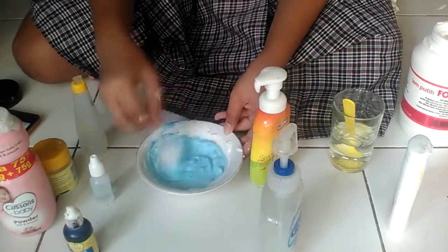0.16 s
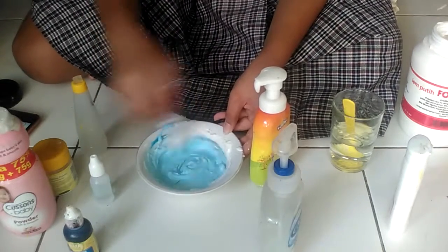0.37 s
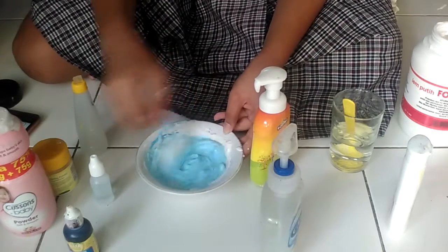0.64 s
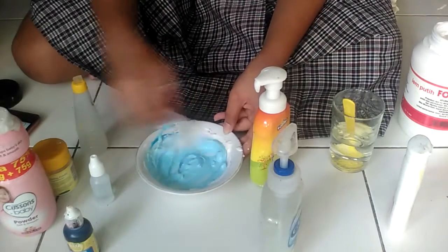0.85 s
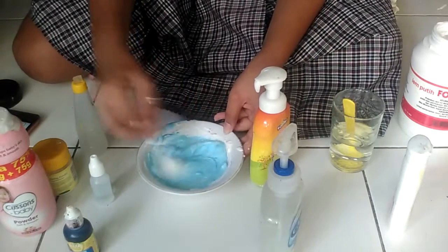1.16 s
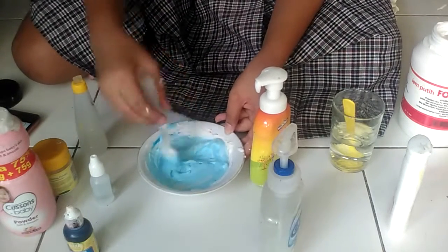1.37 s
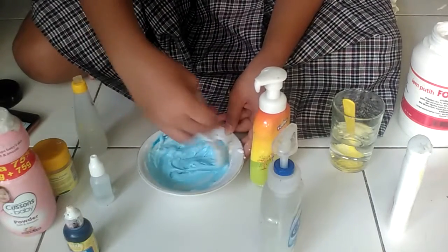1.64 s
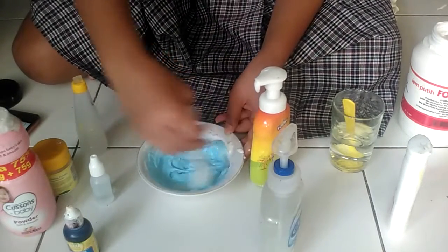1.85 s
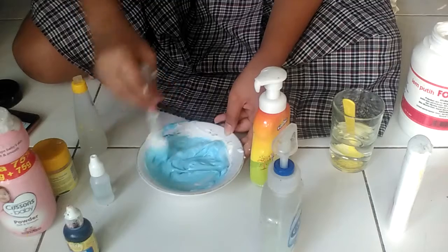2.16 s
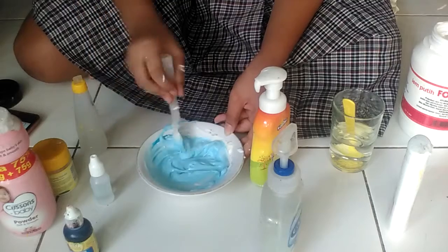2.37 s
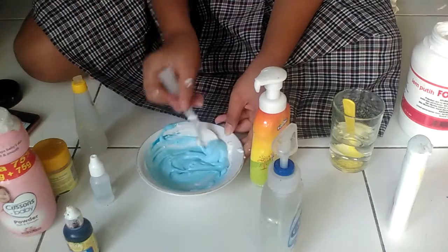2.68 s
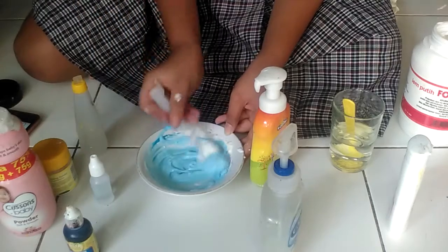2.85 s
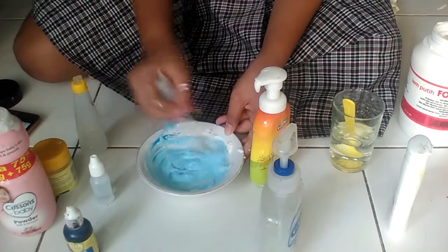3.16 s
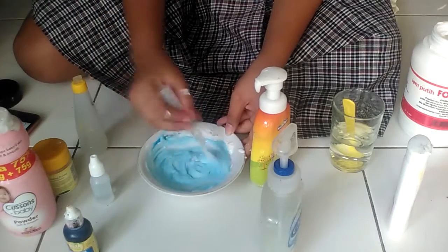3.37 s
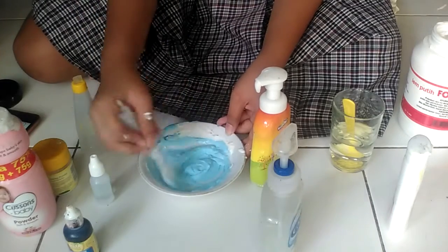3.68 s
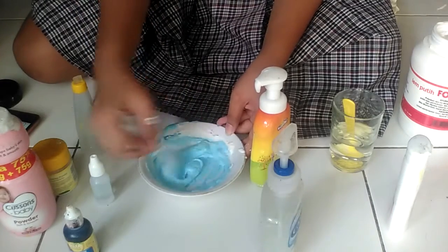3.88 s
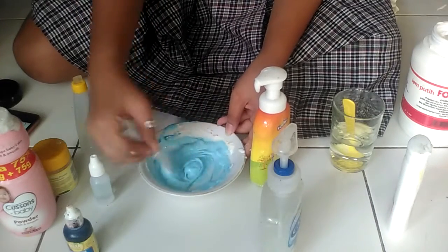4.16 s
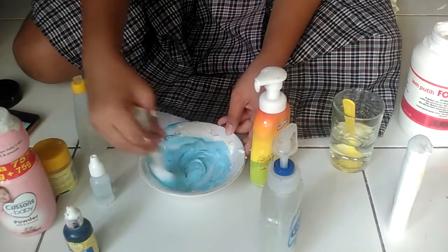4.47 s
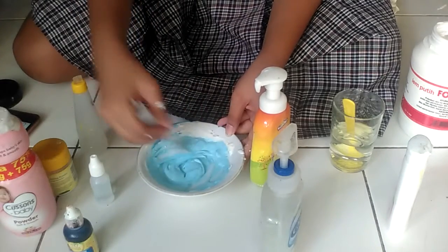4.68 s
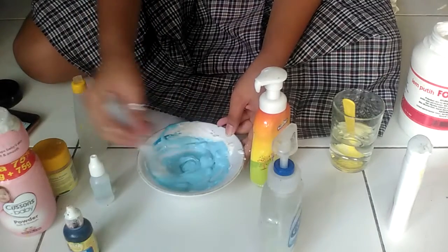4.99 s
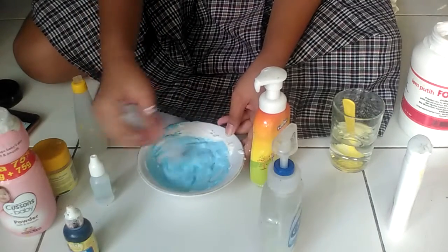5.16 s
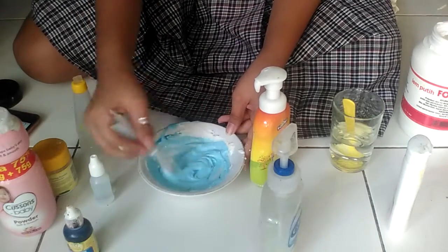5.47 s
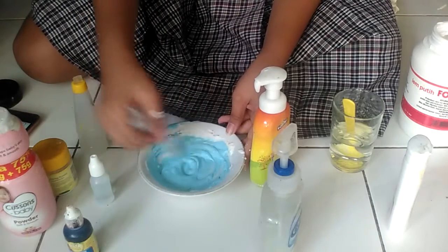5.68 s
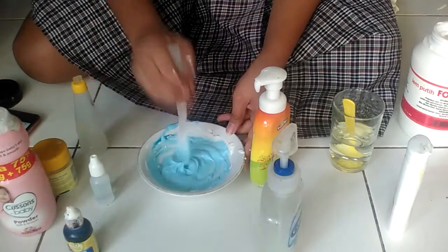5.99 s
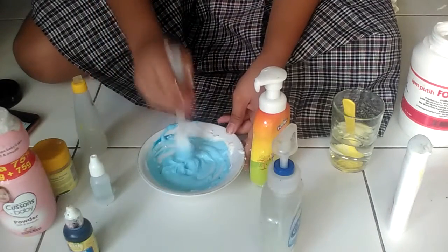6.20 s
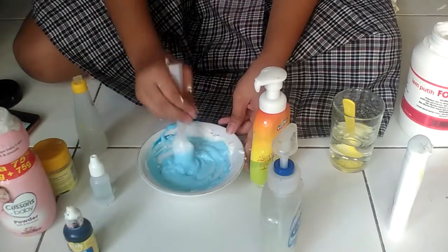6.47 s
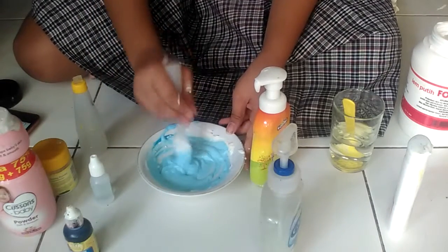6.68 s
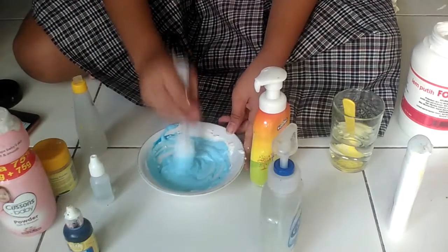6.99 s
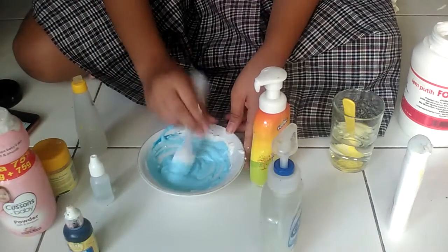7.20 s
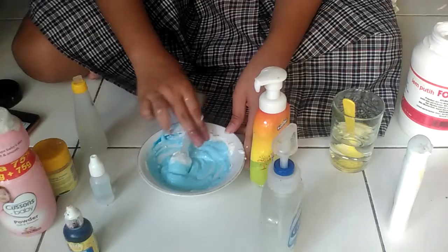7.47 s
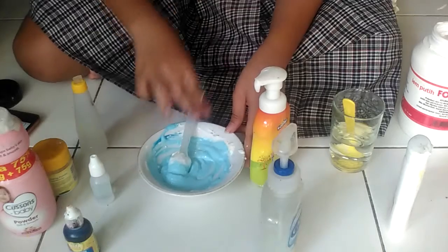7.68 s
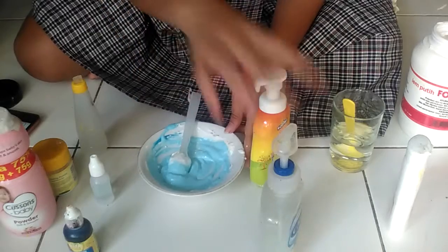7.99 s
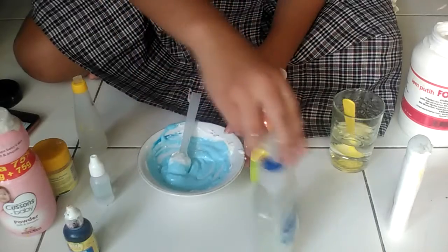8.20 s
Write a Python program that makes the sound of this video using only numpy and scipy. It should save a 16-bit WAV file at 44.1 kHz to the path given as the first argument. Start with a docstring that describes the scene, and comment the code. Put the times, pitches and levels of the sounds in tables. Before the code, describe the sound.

A plastic spoon stirs thick slime in a ceramic bowl, straight ahead of the microphone in a bare, echoing room. It opens with a cluster of ringing taps on the rim, then taps only now and then while the slime smacks and crackles faintly. Later comes a quick, even run of duller knocks on the bottom. Soft bumps end it as the spoon is let go, over a low rumble and faint hiss.

```python
"""Ringing taps of a plastic spoon on the rim of a ceramic bowl, as it stirs thick slime. The bowl is held on
the tiled floor of a bare, echoing room. Between taps the slime smacks and crackles faintly; later the spoon
knocks the slime-damped bottom in a quick run. Soft bumps of hand, spoon and bottle come now and then.
Underneath lie the shifting of bowl and cloth, a low rumble, a hum and faint hiss."""
import sys
import numpy as np
from scipy import signal
from scipy.fft import rfft, irfft, next_fast_len
from scipy.io import wavfile
from scipy.ndimage import map_coordinates

SR = 44100
rng = np.random.default_rng(int(sys.argv[2]) if len(sys.argv) > 2 else 0)


def digitize_waveform(pressure):
    """Quantize a signal to 16-bit integers and store it at the path in sys.argv[1].

    Rows of a 2-D input are taken as channels; values are limited to [-1, 1].
    """
    field = np.atleast_2d(pressure).T
    bounded = np.clip(field, -1, 1)
    quanta = np.round(bounded * 32767).astype(np.int16)
    wavfile.write(sys.argv[1], SR, quanta)


N = 367794
CONTACT_SAMPLES = SR // 6
LN_1000 = np.log(1000)  # 60 dB of decay

# Each row: start in seconds, attack level in dB in each of the four REGISTERS_HZ,
# ring gain in dB, favoured frequency in Hz.
RIM_TAPS = [(-0.15, -31, -26.5, -31.5, -38, -1.5, 1430), (0.0711, -36, -27.5, -29.5, -45.5, 2.5, 1497),
            (0.3125, -27.5, -22.5, -21.5, -26, 1, 3440), (0.527, -45, -36.5, -41.5, -50, 5, 1540),
            (0.533, -34.5, -32, -32, -53, 2.5, 3340), (0.6088, -64, -53, -51.5, -51.5, -20, 5800),
            (0.6581, -46.5, -36, -42.5, -59.5, 7.5, 1510), (0.7512, -45.5, -40.5, -43.5, -89, -0.5, 3500),
            (1.0704, -76, -82.5, -59, -52, -1, 5730), (2.627, -42.5, -35, -38.5, -55.5, -2.5, 3640),
            (2.845, -41.5, -47, -52, -81, 5, 1440), (2.853, -39.5, -30.5, -30, -43.5, 1, 3340),
            (3.078, -52.5, -49.5, -59.5, -76.5, -5.5, 1380), (3.53, -58, -64, -75, -80.5, -2.5, 846),
            (4.516, -54.5, -59, -76.5, -79.5, 1, 850), (4.812, -65.5, -58, -61, -64, 0.5, 3460),
            (4.838, -40, -34, -36, -53.5, 2, 1553), (6.9651, -46, -49, -49, -49, 5.5, 5670)]
# Each row: frequency in Hz, relative level in dB, t60 in seconds.
RIM_MODES = [(672, -10, .035), (864, -7.5, 0.018), (1136, -15.5, 0.06), (1200, -22, .04),
             (1428, -16.5, 0.12), (1530, -21.5, .06), (1745, -11.5, 0.11), (1801, -12.5, .05),
             (2260, -10, 0.019), (2220, -11.5, .015), (2720, -8, 0.0074), (3512, -3.5, 0.033),
             (3541, -9.5, 0.046), (4330, -19.5, 0.019), (5760, -12, 0.048), (7600, -23, 0.0045),
             (10860, -27, 0.012)]
# Each row: frequency in Hz, gain in dB.
RIM_CRACK_EQ = [(150, -20.5), (300, -16.5), (480, -5.5), (700, -6), (1500, 4), (2800, 6.5), (4200, -1.5),
                (6000, -1.5), (7500, -12), (9200, -25.5), (11000, -25), (14000, -37.5)]


def rim_taps(echoes, favour_db=9.5, favour_log_width=0.11):
    """The struck spot favours nearby frequencies; a spoon left pressed on lets the rim ring less."""
    out = np.zeros(N)
    hz, db, t60_s = np.transpose(RIM_MODES)
    for start_s, *levels_db, ring_db, favoured_hz in RIM_TAPS:
        nearness = np.exp(-(np.log(hz / favoured_hz) / favour_log_width) ** 2)
        modes = zip(hz, db + ring_db + favour_db * nearness, t60_s)
        paths = room_response(echoes, scatter_db=-18.0, scatter_s=0.004)
        add(out, start_s, blow(levels_db, modes, RIM_CRACK_EQ, paths, crack_db=25.0, spread_db=4.0))
    return out


# Each row: start in seconds, attack level in dB in each of the four REGISTERS_HZ.
BOTTOM_KNOCKS = [(5.3497, -38.5, -39, -46.5, -50), (5.531, -32, -36, -34, -41),
                 (5.72, -36, -36, -35.5, -40), (5.9129, -38, -33.5, -33.5, -38),
                 (6.0924, -36, -36, -37, -41), (6.2796, -36.5, -33, -34, -39.5),
                 (6.4569, -43, -31, -29.5, -40), (6.6765, -56.5, -41.5, -43.5, -61.5)]
# Each row: frequency in Hz, relative level in dB, t60 in seconds.
BOTTOM_MODES = [(530, -13, 0.027), (765, 6.5, 0.0047), (860, 8.5, 0.018), (1498, -3.5, 0.025),
                (1660, -5, 0.042), (2380, -16.5, 0.033), (2730, -8, 0.0023), (3737, -5, 0.03),
                (5500, -26, 0.013), (5490, -9, 0.0086)]
# Each row: frequency in Hz, gain in dB.
BOTTOM_CRACK_EQ = [(150, -11), (300, -37.5), (480, -7.5), (750, -15.5), (1500, 5), (2600, 6.5), (4200, 8.5),
                   (6000, 8), (7500, -1.5), (9200, -12), (14000, -26.5)]


def bottom_knocks(echoes):
    """The spoon hits the bottom through the slime, which damps the ring."""
    out = np.zeros(N)
    for start_s, *levels_db in BOTTOM_KNOCKS:
        paths = room_response(echoes, scatter_db=-13.5, scatter_s=0.0016)
        knock = blow(levels_db, BOTTOM_MODES, BOTTOM_CRACK_EQ, paths, crack_db=28.5, spread_db=2.5)
        add(out, start_s, knock)
    return out


# Body, low mid, high mid, edge. Each row: lower limit in Hz, upper limit in Hz.
REGISTERS_HZ = [(300, 1150), (1150, 2400), (2400, 4500), (4500, 12000)]


def blow(levels_db, modes, crack_eq, paths, crack_db, spread_db, detune=0.008):
    """One contact, heard in the room: a crack plus modes that the slime loads differently each time."""
    t = np.arange(CONTACT_SAMPLES) / SR
    sound = from_db(crack_db) * colour(signal.unit_impulse(CONTACT_SAMPLES), crack_eq)
    for k, (hz, db, t60_s) in enumerate(modes):
        loaded_hz = hz * (1 + detune * rng.normal())
        gain = (-1) ** k * from_db(db + spread_db * rng.normal())
        sound += gain * np.sin(2 * np.pi * loaded_hz * t) * decay(t, t60_s)
    bass_cut = signal.butter(2, 300, "high", fs=SR, output="sos")  # a small bowl radiates no bass
    sound = signal.fftconvolve(signal.sosfilt(bass_cut, sound), paths)[:len(paths)]
    # Place and hardness of the contact set each register's attack level.
    attack_samples = round(0.015 * SR)
    centres_hz = np.sqrt(np.prod(REGISTERS_HZ, axis=1))
    for _ in range(2):
        attack_rms = [rms(band(sound[:attack_samples], *limits_hz)) for limits_hz in REGISTERS_HZ]
        gains_db = np.array(levels_db) - 20 * np.log10(attack_rms)
        sound = colour(sound, np.column_stack([centres_hz, gains_db]))
    return sound


# Each row: start in seconds, relative level in dB, centre in Hz, rub t60 in seconds.
SOFT_BUMPS = [(2.121, -66, 370, 0.092), (2.781, -59.5, 185, 0.11), (3.27, -66, 257.4, 0.12),
              (3.73, -60, 325, 0.051), (5.342, -54.5, 344, 0.013), (7.552, -53, 481, 0.03),
              (7.57, -54.5, 380, 0.063), (7.579, -70, 1317, 0.023), (7.721, -48, 308, 0.04),
              (8.121, -52.5, 736, 0.032), (8.124, -54, 365, 0.019)]


def bumps(band_ratio=1.3, gain_db=-0.5, rub_db=-10.0):
    """Soft contacts of hand, spoon and bottle: a dull push and a brief rub."""
    out = np.zeros(N)
    t = np.arange(CONTACT_SAMPLES) / SR
    for start_s, db, hz, t60_s in SOFT_BUMPS:
        rub = from_db(rub_db) * rng.standard_normal(len(t)) * decay(t, t60_s)
        thud = band(signal.unit_impulse(len(t)) + rub, hz / band_ratio, hz * band_ratio)
        add(out, start_s, from_db(db + gain_db) * thud / rms(thud[:SR // 50]))
    return out


# Each row: peak time in seconds, half-width in seconds, relative level in dB, centre in Hz. # The short, loud
# row at 7 s is a light bounce of the spoon on the rim.
SLIME_SMACKS = [(0.875, 0.013, -68.5, 5700), (1.5, 0.059, -73.5, 6400), (1.828, 0.038, -65, 1038),
                (2.054, 0.1, -70, 603), (2.552, 0.033, -72, 7300), (2.607, 0.033, -67, 3954),
                (3.286, 0.035, -71, 4800), (3.51, 0.051, -68, 5530), (3.72, 0.15, -70.5, 447),
                (3.976, 0.041, -74, 5850), (4.156, 0.047, -67.5, 4800), (4.209, 0.094, -68.5, 2540),
                (4.237, 0.091, -71.5, 1150), (4.787, 0.045, -64, 3360), (7, 0.0052, -52.5, 5800),
                (7.332, 0.16, -77, 2906), (7.569, 0.03, -69, 6050), (8.134, 0.025, -72, 6000)]


def smacks(band_ratio=1.35, gain_db=-2.0):
    """Slime pulls away from spoon and wall in swells of tiny bursting air pockets; the sharp burst at 7 s is
    the spoon bouncing on the rim."""
    out = np.zeros(N)
    t = np.arange(SR // 2) / SR - 0.25
    for peak_s, half_width_s, db, hz in SLIME_SMACKS:
        pops = air_pops(len(t), pops_per_s=1500, size_db=6.0)
        pops = band(pops + 1e-18, hz / band_ratio, hz * band_ratio)
        swell = np.exp(-2 * (t / half_width_s) ** 2)
        add(out, peak_s + t[0], from_db(db + gain_db) * swell * pops / rms(pops))
    return out


# How hard the spoon works the slime. Each row: time in seconds, relative level in dB.
STIR_EFFORT = [(0, -69), (1.0, -78.5), (2.2, -84), (3.3, -78.5), (4.1, -86), (4.6, -80), (6.5, -85),
               (7.2, -87), (8.34, -82)]
# Each row: frequency in Hz, gain in dB.
SQUELCH_EQ = [(300, -10), (900, 6.5), (2500, 2), (5500, 2), (8000, -5), (14000, -12.5)]


def squelch(clump_db=3, clumps_per_s=9):
    """Stirred slime crackles softly throughout, in clumps as it folds."""
    pops = colour(air_pops(N, pops_per_s=400, size_db=4.0), SQUELCH_EQ)
    return from_db(in_time(STIR_EFFORT) + clump_db * drift(clumps_per_s)) * pops / rms(pops)


def air_pops(samples, pops_per_s, size_db):
    """Air pockets burst at random: many small impulses, a few large."""
    sizes = from_db(size_db * np.minimum(rng.exponential(1, samples), 4))
    signs = rng.choice([-1, 1], samples)
    return sizes * signs * (rng.random(samples) < pops_per_s / SR)


# Off floor, bottles and walls. Each row: delay in seconds, linear gain.
FIRST_REFLECTIONS = [(.0011, 0.15), (.0047, -0.18), (.0078, 0.045), (.0146, 0.23), (0.0178, -0.21),
                     (.043, 0.14)]


def room_response(echoes, scatter_db=-22.5, scatter_s=0.0035, shared_weight=0.4):
    """Paths from one spot in the bowl: its own blend of echoes, near scatter, direct, reflected."""
    blend = rng.standard_normal(len(echoes))
    blend[0] = shared_weight
    response = blend @ echoes / np.linalg.norm(blend)
    t = np.arange(SR // 25) / SR
    response[:len(t)] += from_db(scatter_db) * rng.standard_normal(len(t)) * np.exp(-t / scatter_s)
    response[0] += 1
    for delay_s, gain in FIRST_REFLECTIONS:
        response[round(delay_s * SR)] += gain
    return response


# Each row: frequency in Hz, t60 in seconds, relative echo energy in dB.
ROOM_DECAY = [(200.9, 0.42, 1.5), (492, 0.61, -3), (890, .65, -1.5), (1620, 0.74, -1.5), (2720, 0.46, -5),
              (4000, 0.93, -8.5), (5900, .47, -3.5), (12000, 0.4, -1)]


def room_echo(early_db=-2.0, early_t60_s=0.1, build_s=0.0068):
    """The bare room returns dense early scatter and a tail that dies band by band."""
    t = np.arange(2 * SR // 3) / SR
    room = np.array(ROOM_DECAY)
    edges_hz = np.geomspace(100, 16000, 15)
    white = rng.standard_normal((2, len(t))) / np.sqrt(SR)
    early = from_db(early_db) * decay(t, early_t60_s) / np.sqrt(early_t60_s)
    tail = np.zeros(len(t))
    for k, (low_hz, high_hz) in enumerate(zip(edges_hz, edges_hz[1:])):
        hz = np.sqrt(low_hz * high_hz)
        t60_s, late_db = at_hz(room[:, [0, 1]], hz), at_hz(room[:, [0, 2]], hz)
        late = from_db(late_db) * decay(t, t60_s) / np.sqrt(t60_s)
        tail += band(white[k % 2], low_hz, high_hz) * np.hypot(late, early) * np.sqrt(2 * LN_1000)
    return tail * (1 - np.exp(-t / build_s))


# Each row: frequency in Hz, side gain in dB.
BOWL_SIDE_EQ = [(3200, -67), (4500, -26), (5600, -20), (8000, -10), (14000, -8.5)]


def widen(mid, spread_s=0.005):
    """Brief scatter makes left and right differ in the treble only."""
    t = np.arange(SR // 25) / SR
    scatter = rng.standard_normal(len(t)) * np.exp(-t / spread_s)
    scatter /= np.linalg.norm(scatter)
    side = colour(signal.oaconvolve(mid, scatter)[:N], BOWL_SIDE_EQ)
    return np.array([mid + side, mid - side])


# Each row: time in seconds, relative level in dB.
SHIFT_LEVELS = [(0.0, -66.5), (0.86, -67.5), (1.32, -70.5), (3.07, -63), (3.34, -65.5), (5.99, -68.5),
                (6.2, -69), (7.76, -67), (8.34, -71)]
# Each row: frequency in Hz, gain in dB.
SHIFT_EQ = [(70, -11.5), (150, 7), (220, -3.5), (330, -6), (500, -10.5), (800, -14), (1500, -27),
            (4000, -48.5)]


def shifting(gain_db=1.5, lump_db=2, lumps_per_s=12):
    """The stirring arm moves bowl and cloth unevenly."""
    return from_db(in_time(SHIFT_LEVELS) + gain_db + lump_db * drift(lumps_per_s)) * noise(SHIFT_EQ)


# Each row: time in seconds, relative level in dB.
RUMBLE_LEVELS = [(0.05, -56.5), (0.09, -65), (0.18, -53), (0.25, -66.5), (1.87, -65.5), (2.23, -56),
                 (3.07, -68), (3.23, -54), (3.32, -68.5), (4.04, -59), (6.88, -65.5), (7.02, -74),
                 (7.24, -61), (8.09, -64.5), (8.2, -57.5)]
# Each row: frequency in Hz, gain in dB.
RUMBLE_EQ = [(20, -24), (35, -11.5), (48, -7), (57, 5), (70, -3.5), (100, -6.5), (160, -19.5), (300, -30.5),
             (1000, -55.5)]


def rumble(gain_db=1.0, waver_db=1.97, wavers_per_s=5, hum_hz=54.5, hum_db=-71):
    """A wavering low rumble over a steady hum."""
    hum = from_db(hum_db) * np.sqrt(2) * np.sin(2 * np.pi * hum_hz * np.arange(N) / SR)
    level_db = in_time(RUMBLE_LEVELS) + gain_db + waver_db * drift(wavers_per_s)
    return hum + from_db(level_db) * noise(RUMBLE_EQ)


# Each row: time in seconds, relative level in dB.
HISS_LEVELS = [(0.06, -89), (0.36, -79), (0.5, -73.5), (0.81, -86.5), (1.53, -83.5), (2.05, -91.5),
               (2.35, -86), (2.63, -81), (3.45, -84), (3.71, -78.5), (4.37, -81), (4.58, -82), (5.98, -78),
               (6.6, -76.5), (6.78, -84.5), (7.45, -83.5), (7.66, -83), (8.3, -82)]
# Each row: frequency in Hz, gain in dB.
HISS_EQ = [(300, 9), (1000, 2), (2000, 3.5), (4000, -2.5), (6000, -3.5), (9000, 0.5), (12000, -2),
           (14500, -1)]
# Each row: frequency in Hz, side gain in dB.
HISS_SIDE_EQ = [(2500, -49.5), (4000, -20), (6500, -2), (11000, -4), (14000, -3.5)]


def hiss(gain_db=7.0, waver_db=0.5, wavers_per_s=5):
    """Faint wavering hiss, wide only in the treble."""
    mid = noise(HISS_EQ)
    side = colour(noise(HISS_EQ), HISS_SIDE_EQ)
    level_db = in_time(HISS_LEVELS) + gain_db + waver_db * drift(wavers_per_s)
    return from_db(level_db) * np.array([mid + side, mid - side])


def from_db(db):
    return 10 ** (np.asarray(db) / 20)


def rms(x):
    return np.sqrt(np.mean(x ** 2) + 1e-24)


def decay(t, t60_s):
    return np.exp(-LN_1000 * t / t60_s)


def in_time(rows):
    """Rows of (seconds, value), interpolated per sample."""
    return np.interp(np.arange(N) / SR, *np.transpose(rows))


def at_hz(rows, hz):
    """Rows of (Hz, value), interpolated in log frequency."""
    knots_hz, values = np.transpose(rows)
    return np.interp(np.log(np.maximum(hz, 1)), np.log(knots_hz), values)


def colour(x, eq):
    """Minimum-phase filter from rows of (Hz, dB)."""
    size = 2 * next_fast_len(len(x) // 2 + 2048)
    bins_hz = np.arange(size // 2 + 1) * SR / size
    cepstrum = irfft(np.log(from_db(at_hz(eq, bins_hz))))
    cepstrum[1:size // 2] *= 2
    cepstrum[size // 2 + 1:] = 0
    return irfft(rfft(x, size) * np.exp(rfft(cepstrum)))[:len(x)]


def band(x, low_hz, high_hz):
    limits_hz = [low_hz, min(high_hz, SR / 2 - 1000)]
    return signal.sosfilt(signal.butter(2, limits_hz, "band", fs=SR, output="sos"), x)


def noise(eq):
    """Coloured noise of rms 1."""
    x = colour(rng.standard_normal(N), eq)
    return x / rms(x)


def drift(knots_per_s):
    """Slow random curve, rms about 1."""
    knots = rng.standard_normal(200)
    position = np.arange(N) / SR * knots_per_s
    return map_coordinates(knots, [position], order=1, mode="wrap") * np.sqrt(3 / 2)


def add(track, start_s, sound):
    """Mix in a sound, cropped to the track."""
    start = round(start_s * SR)
    first, last = max(start, 0), min(start + len(sound), N)
    if last > first:
        track[first:last] += sound[first - start:last - start]


def scene(echo_db=3.0, soft_db=-4.0):
    """Spoon, slime and bumps sound straight ahead in one room, over the background."""
    echoes = from_db(echo_db) * np.array([room_echo() for _ in range(4)])
    soft = signal.oaconvolve(bumps() + smacks() + squelch(), room_response(echoes))[:N]
    bowl = rim_taps(echoes) + bottom_knocks(echoes) + from_db(soft_db) * soft
    return widen(bowl) + rumble() + shifting() + hiss()


def record(dry):
    """Steep low-pass on the top treble."""
    cutoff_hz = 14250
    return signal.sosfilt(signal.ellip(14, 0.2, 70, cutoff_hz, fs=SR, output="sos"), dry)


dry = scene()
out = record(dry)
digitize_waveform(out)
```